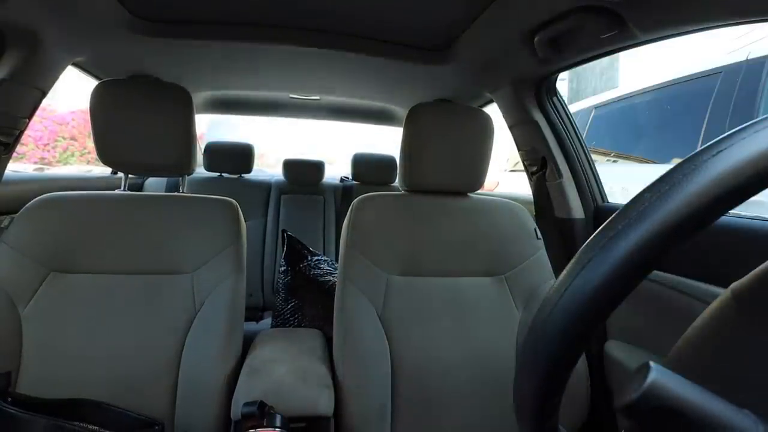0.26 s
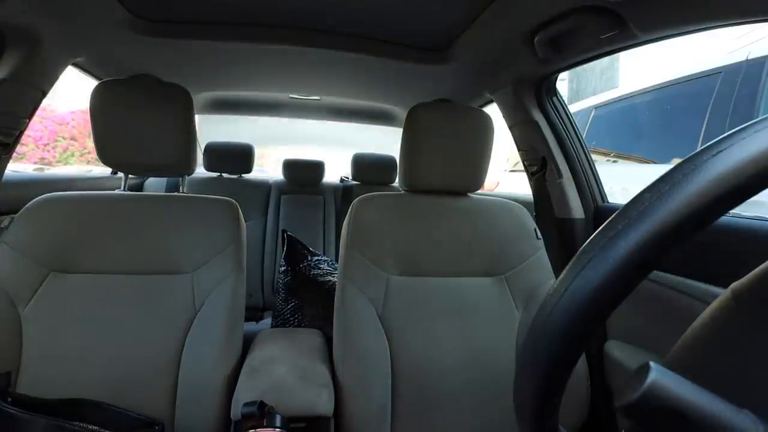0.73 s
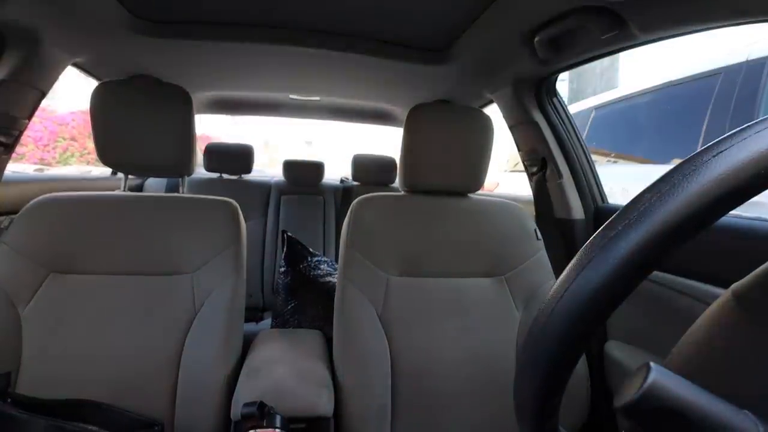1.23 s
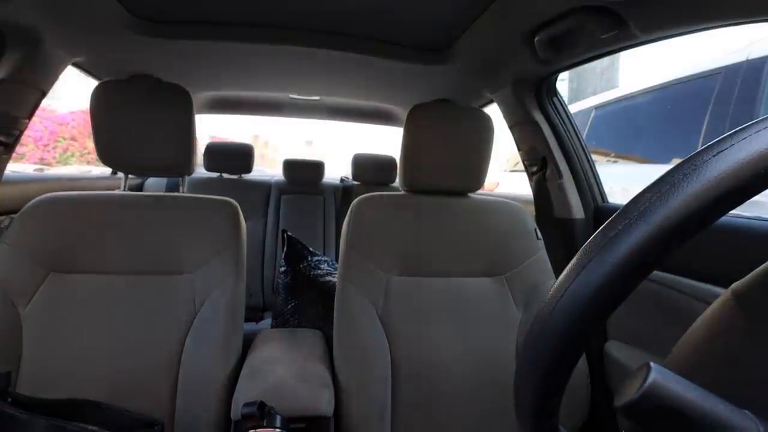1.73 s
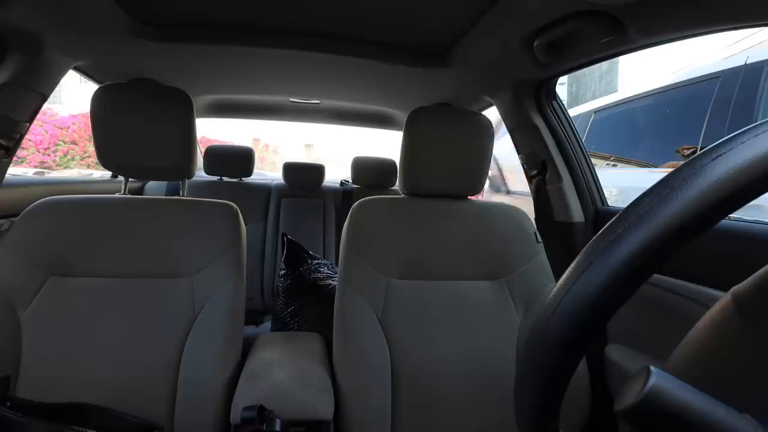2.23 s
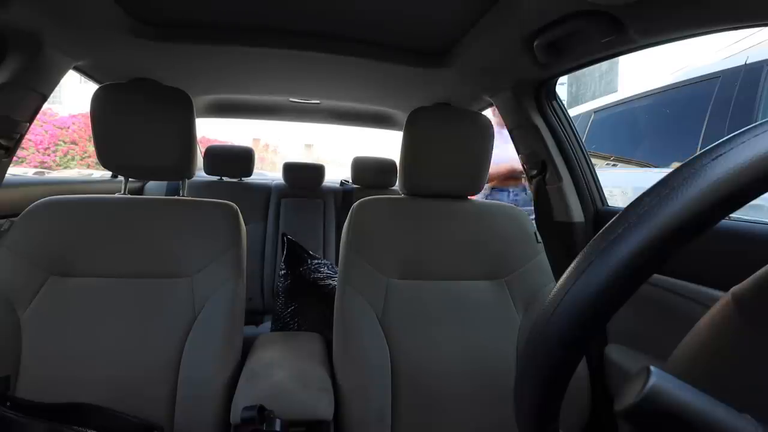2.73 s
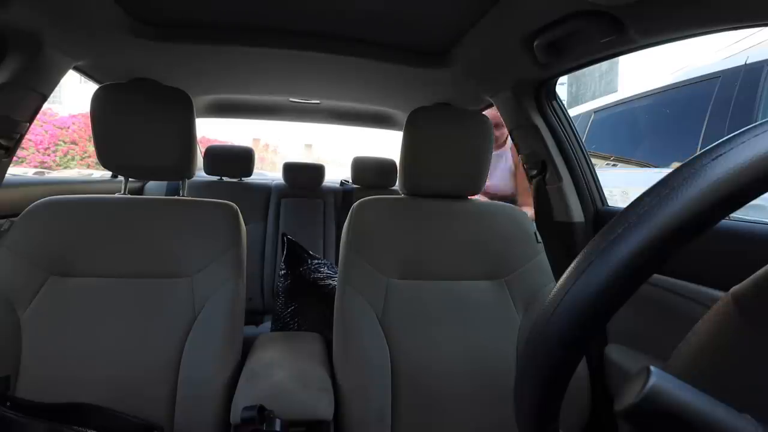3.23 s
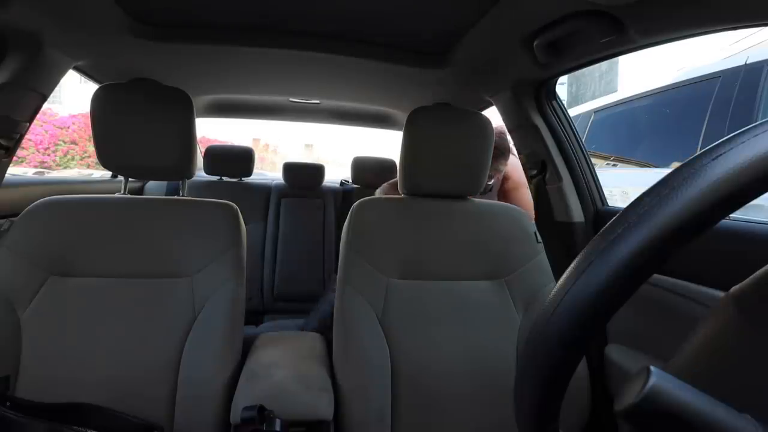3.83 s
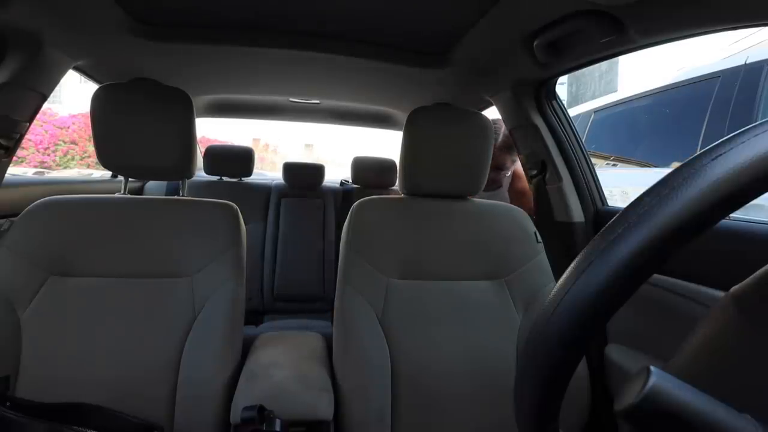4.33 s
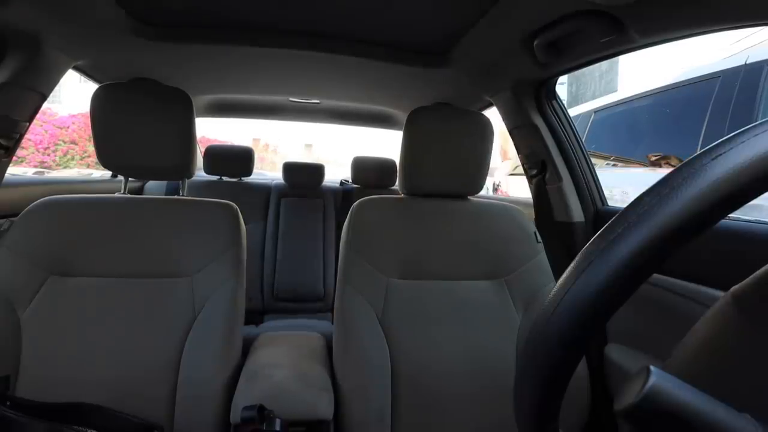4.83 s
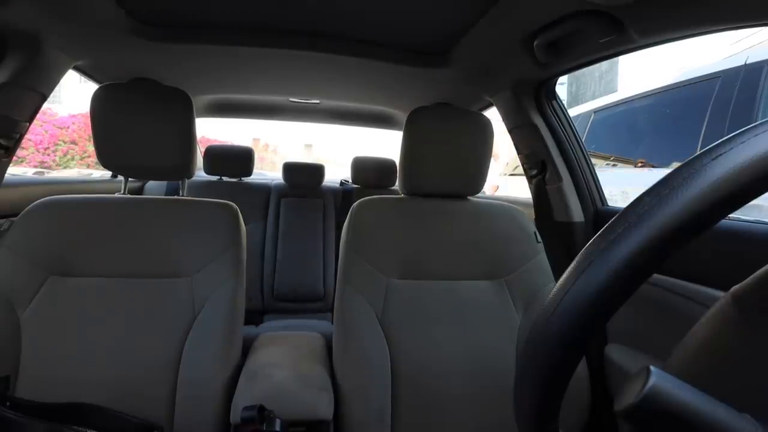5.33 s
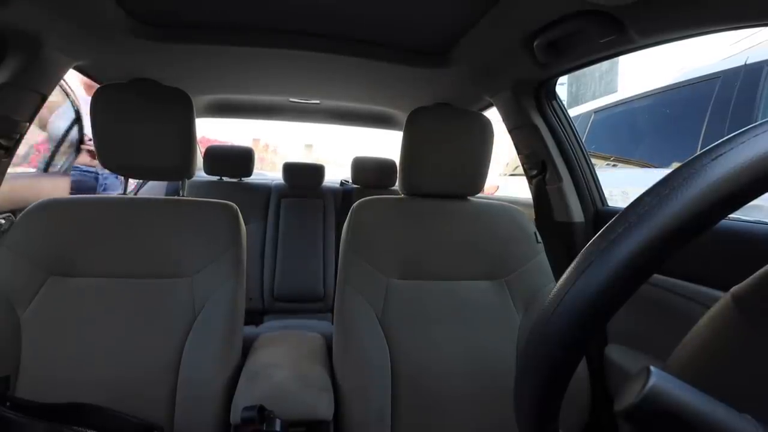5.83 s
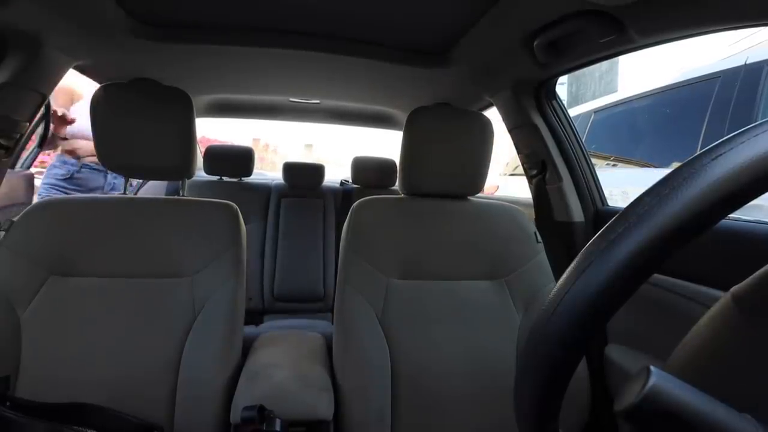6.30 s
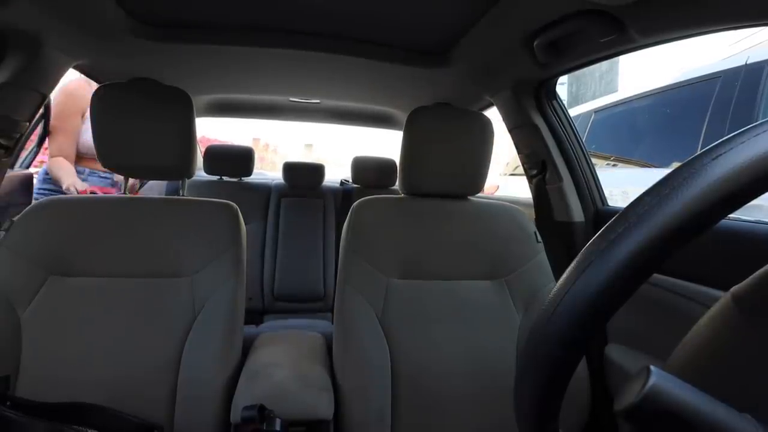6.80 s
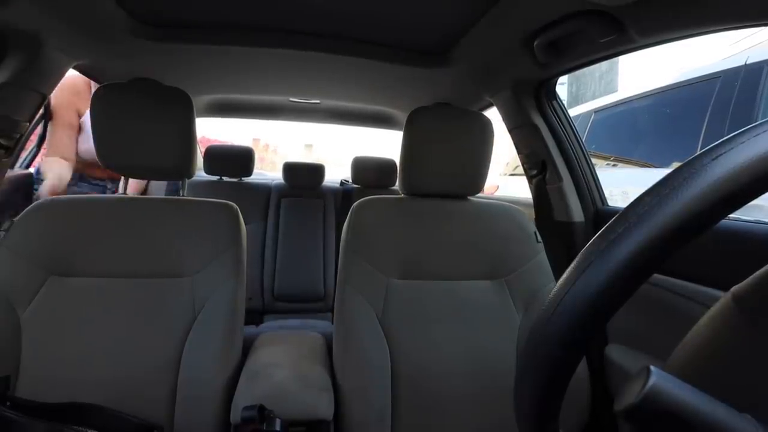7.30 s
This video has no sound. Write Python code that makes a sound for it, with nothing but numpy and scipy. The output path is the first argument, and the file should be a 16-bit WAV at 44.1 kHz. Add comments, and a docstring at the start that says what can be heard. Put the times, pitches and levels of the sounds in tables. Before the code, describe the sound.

A stereo microphone sits in a quiet car cabin, so short, dry sounds come with deep pressure thumps. First a big, overloading door slam, next a solid thunk, then handling of a crinkly bag and tiny metallic jingles. A short rising rub-squeak precedes another slam. After it come a faint motor hum, latch clacks, dragging cloth, crackly scuffs and final knocks.

```python
"""Inside a parked car, street noise leaks in and the cabin booms near 50 Hz; layer levels jump between stretches.
A slam at 1.3 s and a blow at 2.3 s ring thud, panel and latch modes; slams also pump the cabin air.
From 2.4 s a stiff bag crackles (ringing grains) and keys jingle (ringing touches); near 4 s a strap squeaks upward.
A second slam at 4.9 s, then a motor buzzes (sines) around latch clicks; from 6.6 s scuffs, cloth and last knocks.
Two close microphone ports hear the bass alike and the treble in opposition; the slams overload them."""
import sys
import numpy as np
from scipy import signal
from scipy.fft import rfft, irfft, next_fast_len
from scipy.io import wavfile
from scipy.ndimage import uniform_filter1d

SR = 44100
rng = np.random.default_rng(int(sys.argv[2]) if len(sys.argv) > 2 else 0)


def persist_wave(psi):
    """Save psi, clipped to +-1, as 16-bit WAV."""
    counts = np.round(np.clip(psi, -1, 1) * 32767).astype(np.int16)
    wavfile.write(sys.argv[1], SR, np.atleast_2d(counts).T)


N = 333484


def from_db(db):
    """Amplitude ratio of a level in dB."""
    return 10 ** (np.asarray(db) / 20)


def rms_one(x):
    """Scale to rms 1."""
    return x / np.sqrt(np.mean(x ** 2) + 1e-20)


def shaped(x, spectrum):
    """Filter by a gain in dB, interpolated over log frequency."""
    size = next_fast_len(len(x))
    hz, gain_db = np.transpose(spectrum)
    bin_hz = np.arange(size // 2 + 1) * SR / size
    gain = from_db(np.interp(np.log(bin_hz + 1), np.log(hz + 1), gain_db))
    return irfft(rfft(x, size) * gain, size)[:len(x)]


def drift(rate_hz):
    """Slow random wander: noise twice through a one-pole low-pass; rms 1."""
    r = np.exp(-2 * np.pi * rate_hz / SR)
    settled = signal.lfilter([1], [1, -2 * r, r * r], rng.standard_normal(N + SR))[SR:]
    return rms_one(settled)


def ring(force, hz, t60_s):
    """Damped resonance: a unit click sets a sine of initial height 1 ringing."""
    r = from_db(-60 / (t60_s * SR))
    w = 2 * np.pi * hz / SR
    return signal.lfilter([0, np.sin(w)], [1, -2 * r * np.cos(w), r * r], force + 1e-18)


def swell(length_s, rise):
    """Envelopes, one row a sound: power-law rise, exponential fall; time constant held to 0.5-30 ms."""
    age = np.arange(SR // 8) / SR / np.clip(length_s, .0005, .03)[:, None]
    return age ** rise * np.exp(-age)


def noise(spectrum, flicker_db, grain_db):
    """Coloured noise of uneven grains; four bands flicker partly together, partly alone; rms 1."""
    out = 0
    together = drift(15.0)
    edges_hz = np.geomspace(spectrum[1][0], spectrum[-2][0], 5)
    for low, high in zip(edges_hz[:-1], edges_hz[1:]):
        grain_gain = from_db(grain_db * np.minimum(rng.exponential(1, N), 5))
        grains = rng.standard_normal(N) * grain_gain
        band_hz = [low / 1.2, min(high * 1.2, .45 * SR)]
        band = signal.sosfilt(signal.butter(1, band_hz, "band", fs=SR, output="sos"), grains)
        flicker = from_db(flicker_db * (.6 * together + drift(25.0)))
        out = out + rms_one(band) * np.sqrt(high - low) * flicker
    return rms_one(shaped(out, spectrum))


# steady backgrounds: start t/s, relative levels/dB of boom, shudder, street, cloth, hiss,
# sink of boom and shudder / dB per s, sink of the others / dB per s
STRETCH_LEVELS = [(0.0, -31, -43.5, -49, -62, -71.5, -4.5, 0),
                  (1.128, -23.5, -42, -44, -58.5, -73.5, 2, 15), (1.27, -24, -44, -66, -81.5, -99, 4, -7.5),
                  (2.163, -30.5, -46.5, -51, -64, -76, -3, -3.5),
                  (2.918, -26, -47.5, -53.5, -61, -75, 0, -5), (3.697, -26.5, -40.5, -41, -39.5, -62, 2, 6),
                  (4.28, -27.5, -37, -39, -40.5, -57.5, 1, -5),
                  (4.769, -41, -48, -56.5, -64, -70, -17.5, 4), (5.09, -21, -33, -50, -62.5, -71, 14, 11),
                  (5.262, -48.5, -51, -56.5, -61, -71, 10, 5), (5.525, -59, -48.5, -68, -80, -90, -1, 1),
                  (5.553, -53, -43.5, -51.5, -69.5, -81.5, 0.5, -30),
                  (5.83, -50.5, -50.5, -50, -56, -72.5, 12, 17),
                  (6.23, -40.5, -54, -52.5, -58.5, -71, 12, 2), (6.6, -33.5, -43, -44.5, -51, -73, -6, 2)]


def stretch_at(s):
    """Index of the stretch a moment belongs to."""
    starts_s = np.array(STRETCH_LEVELS)[:, 0]
    return np.maximum(np.searchsorted(starts_s, s, "right") - 1, 0)


def background():
    """Gains of five steady layers: each stretch starts at its own level and changes evenly in dB."""
    t = np.arange(N) / SR
    now = np.array(STRETCH_LEVELS)[stretch_at(t)].T
    sink_db_per_s = now[[6, 6, 7, 7, 7]]
    return from_db(now[1:6] - sink_db_per_s * (t - now[0]))


def surges(rows, rise_db_per_s, fall_db_per_s):
    """Gains stirred up by events, each within its stretch: even climb in dB to the peak, even fall."""
    t = np.arange(N) / SR
    stretch = stretch_at(t)
    power = 0
    for s, *peak_db in rows:
        before_db = np.outer(rise_db_per_s, np.maximum(s - t, 0))
        after_db = np.outer(fall_db_per_s, np.maximum(t - s, 0))
        level_db = np.array(peak_db)[:, None] - before_db - after_db
        power = power + (stretch == stretch_at(s)) * from_db(level_db) ** 2
    return np.sqrt(power)


# cabin air resonance: f/Hz, relative density/dB
BOOM_SPECTRUM = [(12, -55), (20, -9), (34, -5), (48, -1), (64, -5.5), (91, -19), (100, -42), (130, -37),
                 (220, -120)]
# floor pan and panels: f/Hz, relative density/dB
SHUDDER_SPECTRUM = [(47, -14.5), (80, 5), (92, 1), (119, -0.5), (178, -3), (290, -20), (380, -46.5),
                    (640, -120)]


def car_body(boom_gain, shudder_gain):
    """Cabin air and floor pan resonate when the car is shaken; the boom's swing is evened out."""
    boom = noise(BOOM_SPECTRUM, 0, 0)
    envelope = np.abs(signal.hilbert(boom, next_fast_len(N))[:N])
    boom = rms_one(boom / (uniform_filter1d(envelope, size=800) + 0.35))
    shudder = noise(SHUDDER_SPECTRUM, flicker_db=1.5, grain_db=-3)
    return from_db(-4.5) * boom_gain * boom + shudder_gain * shudder


# street wash: f/Hz, relative density/dB
STREET_SPECTRUM = [(140, -21.5), (240, -0.5), (325, 6.5), (433, -2), (668, -5.5), (725, -8), (1180, -14),
                   (1700, -18.5), (2210, -24.5), (3740, -120)]
# cloth rustle: f/Hz, relative density/dB
CLOTH_SPECTRUM = [(820, 3), (1400, -2), (1950, -4.5), (2090, -3), (2700, -6), (4040, -14), (5410, -19.5),
                  (6000, -25.5), (7800, -76.5), (13200, -120)]
# fine hiss, also the bright fringe of the scuffs: f/Hz, relative density/dB
BAG_SPECTRUM = [(2940, 3.5), (5000, -3.5), (6740, -8.5), (7620, -10), (9520, -20.5), (12600, -20.5),
                (15500, -23.5)]


def air(street_gain, cloth_gain, hiss_gain):
    """Smooth street wash, grainy cloth friction and a finer, grainier hiss on top."""
    street = street_gain * noise(STREET_SPECTRUM, flicker_db=0.5, grain_db=1.5)
    cloth = cloth_gain * noise(CLOTH_SPECTRUM, flicker_db=2.0, grain_db=2.5)
    hiss = hiss_gain * noise(BAG_SPECTRUM, flicker_db=3.5, grain_db=4.5)
    return street + cloth + hiss


# car rocks after a blow or under a hand: peak t/s, relative levels/dB of boom, shudder, trim rattle
SHAKE_PEAKS = [(0.24, -38.5, -34, -48), (0.93, -28, -37.5, -52), (1.25, -10.5, -31.5, -49.5),
               (1.385, -7, -18.5, -40.5), (1.58, -16.5, -36.5, -59.5), (2.22, -38.5, -49, -39),
               (2.31, -20.5, -16.5, -39), (3.3, -24, -55, -57), (3.62, -22, -59.5, -64),
               (3.72, -39, -32, -34), (4.3, -24, -36, -40), (4.44, -27, -33.5, -39),
               (4.58, -34.5, -28, -35.5), (4.73, -31.5, -33.5, -37), (4.89, -13, -26, -34.5),
               (4.97, -10.5, -25, -41), (5.05, -11, -20.5, -42.5), (5.72, -50, -32.5, -38),
               (6.25, -26, -41, -42.5), (6.3, -40, -36.5, -53), (6.8, -32, -39, -49),
               (7.03, -27, -59, -64.5), (7.3, -24, -54.5, -49), (7.56, -21, -37, -31.5)]
# climb before the peak: boom, shudder, trim [dB per s]
SHAKE_CLIMB_DB_PER_S = (195.5, 157, 142)
# fall after the peak: boom, shudder, trim [dB per s]
SHAKE_DROP_DB_PER_S = (128, 106, 144.5)
# cloth and bag are moved: peak t/s, relative levels/dB of cloth, hiss
RUSTLE_PEAKS = [(2.23, -59, -80), (2.96, -69, -64), (3.2, -46.5, -41.5), (3.32, -65.5, -52.5),
                (3.705, -35, -47), (4.885, -54, -80), (5.74, -50.5, -74), (5.88, -58.5, -86),
                (6.63, -43.5, -82), (6.78, -46.5, -53.5), (6.98, -48, -68), (7.1, -40, -73),
                (7.25, -38.5, -63), (7.37, -41, -66), (7.52, -39, -61)]
RUSTLE_RISE_DB_PER_S, RUSTLE_FALL_DB_PER_S = (237.5, 265), (84, 103.5)   # cloth, hiss
BOOM_WANDER_DB, JUMP_S = 1.4, .01


def noises():
    """Steady and stirred levels add in power; trim rattle is noise of the street wash's colour."""
    steady = background()
    steady[0] *= from_db(BOOM_WANDER_DB * drift(9.9))
    shaken = surges(SHAKE_PEAKS, SHAKE_CLIMB_DB_PER_S, SHAKE_DROP_DB_PER_S)
    rustled = surges(RUSTLE_PEAKS, RUSTLE_RISE_DB_PER_S, RUSTLE_FALL_DB_PER_S)
    gains = np.hypot(steady, [*shaken, *rustled])
    boom, shudder, street, cloth, hiss = uniform_filter1d(gains, size=round(JUMP_S * SR), axis=1)
    return car_body(boom, shudder) + air(street, cloth, hiss)


# small motor outside, harmonics: f/Hz, relative level/dB
BUZZ_HARMONICS = [(290.7, -56), (576.0, -61.5), (866.7, -62), (1157, -67.5), (1443, -69), (1733, -72.5),
                  (2024, -68.5), (2315, -68), (2600, -77)]
# motor heard: start t/s, end t/s, level/dB
BUZZ_SPANS = [(5.14, 5.528, -6), (5.89, 6.63, -5)]
# faint steady tones: start t/s, end t/s, f/Hz, rms pitch wander/Hz, relative level/dB
FAINT_TONES = [(1.6, 2.156, 1280, 2, -81.5), (2.77, 3.7, 351.8, 12.63, -60.5), (5.2, 5.53, 6067, 12, -85),
               (5.89, 6.6, 6100, 13, -84)]


def tones():
    """Motor harmonics and faint tones are sines with one slight common level waver."""
    t = np.arange(N) / SR
    waver = from_db(1.9 * drift(5.3))
    heard = 0
    for start, end, level_db in BUZZ_SPANS:
        heard = heard + from_db(level_db) * np.clip(np.minimum(t - start, end - t) / 0.026, 0, 1)
    buzz = sum(from_db(db + 5.5) * np.sin(2 * np.pi * hz * t + hz) for hz, db in BUZZ_HARMONICS)
    out = heard * waver * buzz
    for start, end, hz, width_hz, level_db in FAINT_TONES:
        on = np.clip(np.minimum(t - start, end - t) / 0.022, 0, 1)
        phase = 2 * np.pi * np.cumsum(hz + width_hz * drift(10.9)) / SR
        out += on * waver * from_db(level_db + 10.5) * np.sin(phase)
    return out


# thin dry ticks: t/s, relative level/dB
TICK_CLICKS = [(1.1315, -13.5), (1.244, -19.5), (2.1653, -24), (3.1674, -34), (4.7665, -16), (5.5543, -42)]


def ticks():
    """Single-sample clicks, the same at both ports."""
    out = np.zeros(N)
    for s, level_db in TICK_CLICKS:
        out[round(s * SR)] = from_db(level_db - 13.0)
    return out


# key modes: f/Hz, relative level/dB
KEY_MODES = [(5720, -4), (6460, -20), (7050, -11), (7880, -14), (9120, -3.5), (9440, -9), (9870, -3),
             (10400, -7), (11400, -1), (11650, -3), (12000, -6), (12600, -6), (13900, -6), (15600, 11)]
# jingles of the bunch: t/s, relative level/dB, time constant/s
KEY_JINGLES = [(3.168, -46.5, .03), (3.222, -49, .025), (3.303, -57, 0.025), (3.35, -60, 0.0082),
               (3.47, -59, 0.011), (3.594, -61, 0.018), (3.64, -60.5, 0.021), (3.7, -63, 0.035),
               (6.75, -60, 0.021), (6.802, -64, 0.017)]
KEY_T60_S, TOUCHES_PER_S = .09, 600


def keys():
    """Uneven touches of metal ring the key modes; every jingle favours other modes."""
    s, level_db, length_s = np.transpose(KEY_JINGLES)
    starts = np.round(s * SR).astype(int)
    shapes = swell(length_s, rise=0.34)
    favour_db = 3.0 * rng.standard_normal((len(s), len(KEY_MODES)))
    out = np.zeros(N + SR)
    for (hz, mode_db), own_db in zip(KEY_MODES, favour_db.T):
        hits = rng.random(shapes.shape) < TOUCHES_PER_S / SR
        touches = hits * rng.standard_normal(shapes.shape) * shapes
        clicks = np.zeros(N + SR)
        for at, touch, gain in zip(starts, touches, from_db(level_db + mode_db + own_db)):
            clicks[at:at + len(touch)] += gain * touch
        out += ring(clicks, hz, KEY_T60_S)
    return out[:N]


# strap dragged over the seat: t/s, f/Hz, relative level/dB
STRAP_WHISTLE = [(3.93, 1040, -46), (4.03, 1170, -38), (4.17, 1390, -36), (4.25, 1480, -41),
                 (4.34, 1650, -43)]
# side strands of the squeak: pitch ratio, relative level/dB
SIDE_STRANDS = [(.87, -4), (1.14, -8)]


def strap():
    """Friction squeak: as pitch rises it roughens and frays into patchy side strands."""
    first, last = STRAP_WHISTLE[0], STRAP_WHISTLE[-1]
    curve = [(first[0] - .02, first[1], -90), *STRAP_WHISTLE, (last[0] + 0.022, last[1], -90)]
    s, pitch_hz, curve_db = np.transpose(curve)
    t = np.arange(N) / SR
    hz = np.interp(t, s, pitch_hz)
    level_db = np.interp(t, s, curve_db)
    rough = np.clip((hz - 1100) / 300, .35, 1)
    phase = 2 * np.pi * np.cumsum(hz) / SR
    out = 0
    for ratio, strand_db in [(1, 0.011), *SIDE_STRANDS]:
        # only the main strand keeps a steady part
        clean, share = (.8 + 1.2 * (1 - rough), 1) if ratio == 1 else (0, rough)
        sine_sway = rough * drift(90.0)
        cosine_sway = rough * drift(90.0)
        patchy = from_db(strand_db + 3 * drift(20.0))
        strand = (clean + sine_sway) * np.sin(ratio * phase) + cosine_sway * np.cos(ratio * phase)
        out = out + share * patchy * strand
    return from_db(level_db - 5.5) * out


# handles, seals and stiff bag grasped: t/s, relative level/dB, time constant/s, centre f/Hz, treble/dB
SCUFF_EVENTS = [(1.307, -45, 0.012, 2310, -85), (1.36, -47.5, 0.02, 2400, -84),
                (2.242, -40, .01, 2400, -64.5), (2.268, -34.5, 0.006, 2300, -63.5),
                (2.463, -33, .007, 2200, -68), (2.478, -34, 0.0049, 1500, -71),
                (2.585, -36.5, 0.004, 2960, -68), (2.679, -42.5, 0.023, 2360, -65),
                (2.82, -43, 0.023, 2600, -79), (2.871, -37.5, 0.0082, 2430, -51.5),
                (2.891, -36.5, 0.01, 2900, -48), (2.928, -40, 0.0095, 2270, -47),
                (2.963, -39, 0.0061, 2680, -77), (3.137, -29, 0.005, 2620, -50),
                (3.178, -34, .006, 2500, -55), (3.196, -22, 0.021, 2520, -29),
                (3.206, -24, 0.007, 1300, -60), (3.277, -28.5, 0.018, 2570, -45),
                (3.286, -27, 0.014, 3620, -55), (3.32, -23.5, 0.0096, 2640, -33.5),
                (3.351, -28.5, 0.0059, 2760, -32.5), (3.397, -35.5, 0.0093, 2260, -61),
                (3.471, -33.5, 0.016, 2770, -42.5), (3.497, -39, 0.0069, 2610, -45),
                (3.593, -32.5, 0.035, 3300, -55), (3.641, -40, 0.034, 2680, -47),
                (4.445, -20, 0.0028, 2200, -65), (4.951, -37.5, 0.0065, 1900, -76),
                (5.678, -46, 0.013, 2000, -75), (5.748, -38, .006, 3000, -71),
                (5.821, -8, 0.004, 3500, -80), (5.827, -24, 0.0097, 3200, -70),
                (5.836, -28, 0.014, 1150, -75), (6.613, -29.5, 0.0089, 2840, -69),
                (6.644, -30, 0.0073, 2700, -65), (6.678, -29, 0.0054, 1650, -68),
                (6.695, -32, 0.035, 2920, -47), (6.7546, -25, 0.038, 2980, -44),
                (6.762, -25.5, 0.011, 970, -60.5), (6.784, -27, 0.013, 3000, -43),
                (6.838, -39, 0.0024, 2430, -44), (6.913, -27.5, .006, 2000, -61),
                (6.958, -35, .006, 2390, -65), (7, -34, 0.0046, 2200, -65), (7.069, -34.5, 0.01, 2800, -64),
                (7.137, -27.5, 0.006, 2080, -62), (7.206, -25.5, 0.0062, 2320, -40),
                (7.219, -28, 0.0033, 2300, -55), (7.288, -20, 0.0073, 2350, -46.5),
                (7.365, -34, 0.0084, 2300, -62)]
# narrow rings of the bag: f/Hz, relative level/dB
BAG_MODES = [(930, -2.5), (1590, -6), (1980, -4), (2520, 4.5), (2800, -1), (3600, 2), (4240, -7)]
GRAINS_PER_S = 3000


def scuffs():
    """Dense crackle: broad ring at each grasp's pitch, the bag's rings nearest to it, bright fringe."""
    out = np.zeros(N + SR)
    shapes = swell(np.array(SCUFF_EVENTS)[:, 2], rise=0.52)
    hits = (rng.random(shapes.shape) < GRAINS_PER_S / SR) * rng.standard_normal(shapes.shape)
    grains = hits * from_db(1.5 * np.minimum(rng.exponential(1, shapes.shape), 5))
    bright = signal.butter(2, 5500, "high", fs=SR, output="sos")
    favour_db = 3 * rng.standard_normal((len(shapes), len(BAG_MODES)))
    for event, shape, grain, own in zip(SCUFF_EVENTS, shapes, grains, favour_db):
        s, level_db, _, hz, treble_db = event
        narrow = 0
        for (mode_hz, mode_db), own_db in zip(BAG_MODES, own):
            gain_db = mode_db + own_db - 10.0 * abs(np.log2(mode_hz / hz))
            narrow = narrow + from_db(gain_db) * ring(grain, mode_hz, 87.0 / mode_hz)
        broad = ring(ring(grain, hz, 0.99 / hz), hz, 10.0 / hz)
        body = from_db(level_db - 3.5) * rms_one(broad + from_db(-10.5) * narrow)
        treble = shaped(signal.sosfilt(bright, grain), BAG_SPECTRUM)[:len(grain)]
        fringe = from_db(treble_db - 6.0) * rms_one(treble)
        at = round(s * SR)
        out[at:at + len(shape)] += shape * (body + fringe)
    return out[:N]


# slammed door pumps the cabin air: start t/s, peak level/dB, length/s
AIR_PUMPS = [(1.266, 3, 0.012), (1.369, 0, 0.016), (1.397, -3, 0.014), (4.873, 0, .014), (5.047, -4, .016)]


def pumps():
    """Each slam's over-pressure is one smooth sine-squared pulse."""
    t = np.arange(N) / SR
    out = 0
    for s, level_db, length_s in AIR_PUMPS:
        out = out + from_db(level_db) * np.sin(np.pi * np.clip((t - s) / length_s, 0, 1)) ** 2
    return out


CABIN_T60_S, CABIN_DB = 0.095, -11


def cabin(x):
    """The padded cabin answers with a short dense decaying tail, thin in the bass."""
    tail = rng.standard_normal(SR // 4) * from_db(-60 * np.arange(SR // 4) / SR / CABIN_T60_S)
    tail = tail / np.sqrt(np.sum(tail ** 2))
    tail = signal.sosfilt(signal.butter(1, 400, "high", fs=SR, output="sos"), tail)
    return x + from_db(CABIN_DB) * signal.fftconvolve(x, tail)[:N]


def strike(out, times_s, forces, modes, level_at, choke=1):
    """Add every blow's ringing of each mode; a mode feels only its own range of the force."""
    for hz, mode_db, t60_s in modes:
        rings = ring(ring(forces, hz, 1.74 / hz), hz, t60_s) * choke
        level_db = level_at(hz) + mode_db + rng.normal(0, 1.0, len(times_s))
        gains = from_db(level_db) / np.abs(rings).max(axis=1)
        for at, gain, shape in zip(np.round(times_s * SR).astype(int), gains, rings):
            out[at:at + len(shape)] += gain * shape


# blows on door, lid and latch: t/s, relative levels/dB of thud, panel ring, clank, crack,
# strongest thud f/Hz, strongest ring f/Hz
BLOW_EVENTS = [(0.918, -25, -33.5, -58, -60, 62, 260), (1.254, -14, -12.5, -22, -39, 70, 284),
               (1.26, -12.5, -4, -12.5, -27, 178.5, 273), (1.265, -14.5, -29, -47, -33, 62, 300),
               (1.31, -2, -21.5, -35.5, -53.5, 62.3, 355), (1.337, -22.5, -19, -38, -66, 60.8, 370),
               (1.37, -16, -19.5, -39, -60, 62, 260), (1.398, -13, -22, -55, -69.5, 61.5, 262),
               (1.438, -13.5, -43.5, -72, -70.5, 61, 264), (1.458, -24.5, -24.5, -59, -76, 166.6, 259),
               (2.19, -45, -32, -47, -51.5, 62.7, 286), (2.274, -32, -33.5, -30, -45, 179, 399),
               (2.281, -8.5, -3, -16.5, -35, 125, 270), (2.296, -24, -13, -24.5, -44.5, 180, 275),
               (2.309, -22, -13.5, -26.5, -54, 175, 330), (2.325, -23, -18, -32.5, -57, 181, 330),
               (2.343, -20.5, -17.5, -53.5, -72, 119, 326), (2.457, -19, -27.5, -33, -35.5, 62, 520),
               (2.633, -20, -35, -39.5, -37, 62, 370), (3.701, -27, -31, -26, -33, 62, 443),
               (3.9, -53, -45, -37, -20.5, 62, 541), (4.289, -14.5, -29, -45, -55, 70.6, 331),
               (4.572, -12, -36.5, -26, -50.5, 120.7, 280), (4.628, -20, -16.5, -24.5, -34.5, 92.8, 335),
               (4.69, -38.5, -26, -27, -31, 62, 303), (4.856, -29, -8, -12.5, -38, 177, 280),
               (4.861, -27, 0, -8.5, -28.5, 177, 495), (4.871, -15.5, -3, -7.5, -22.5, 62, 490),
               (4.878, -18.5, -29.5, -35, -50, 54.6, 301), (4.926, -28.5, -20.5, -48.5, -48.5, 77, 263),
               (4.959, -11.5, -26, -42, -53.5, 61.7, 350), (5.04, -14, -28, -48, -57, 55, 380),
               (5.067, -25, -33, -40, -45, 78, 265), (5.552, -44.5, -32.5, -59, -78, 172, 267),
               (5.595, -37, -30.5, -61, -64, 145, 314), (5.7, -35.5, -26.5, -24.5, -48, 161, 284),
               (5.708, -29, -15.5, -24.5, -40, 97, 307), (5.73, -29, -17, -38, -47, 180, 247),
               (5.75, -33, -19.5, -54, -47, 180, 290), (5.82, -43, -43, -24, -25, 183, 455),
               (6.24, -50, -25, -47, -46.5, 62, 303), (6.268, -27.5, -27.5, -38, -50, 148, 296),
               (6.655, -50, -21.5, -50, -48, 180, 350), (6.911, -57, -39, -51, -31.5, 67, 283),
               (7.518, -36, -27, -39, -54, 163, 334), (7.542, -28, -18.5, -36, -48, 120, 406)]
# thud modes: f/Hz, relative level/dB, t60/s
THUD_MODES = [(49.1, -11, 0.072), (81, -3.5, 0.08), (124.5, 4, 0.12), (181.7, 3.5, 0.14), (244, -4, 0.023)]
# panel modes, first six ring, the rest clank: f/Hz, relative level/dB, t60/s before the choke
PANEL_MODES = [(270, -1, .06), (313, 0.5, 0.067), (348, 0, 0.083), (399, -4, 0.043), (544, 4.5, 0.088),
               (615, -9.5, 0.023), (720, -3.5, .03), (787, -1.5, 0.035), (946, -6.5, 0.054),
               (1000, -0.5, 0.027), (1167, -4.5, 0.016), (1388, -7, 0.027)]
# latch modes: f/Hz, relative level/dB, t60/s
LATCH_MODES = [(1730, -6, 0.014), (1950, -5, 0.012), (2337, 10.5, 0.0064), (2780, 7.5, 0.0029),
               (2950, 8.5, 0.0033), (3660, -5, 0.022), (5100, -1, 0.0037), (5940, 4.5, 0.0015),
               (8120, -8.5, 0.0056), (11800, -11, 0.00067)]
RATTLE_S, CRACK_S = 0.0031, 0.0015   # time constants
CRACK_TILT_DB_PER_OCTAVE, TILT_PER_DB = -10.5, 0.627   # brighter the more crack stands over clank
SEAL_AFTER_S, SEAL_DB_PER_S = .011, 1500.5   # the rubber seal then chokes the panels


def blows():
    """Swelling contact rattles and a soft push excite body modes; where a blow lands favours some."""
    s, thud_db, ring_db, clank_db, crack_db, thud_hz, centre_hz = np.transpose(BLOW_EVENTS)
    tilt_db = CRACK_TILT_DB_PER_OCTAVE + TILT_PER_DB * (crack_db - clank_db)
    size = (len(s), SR // 8)
    rattles = rng.standard_normal(size) * swell(np.full(len(s), RATTLE_S), rise=1.09)
    cracks = rng.standard_normal(size) * swell(np.full(len(s), CRACK_S), rise=2.4)
    pushes = np.zeros((len(s), SR // 3))
    pushes[:, :SR // 200] = np.hanning(SR // 200)   # 5 ms
    choke = from_db(-SEAL_DB_PER_S * np.maximum(np.arange(SR // 8) / SR - SEAL_AFTER_S, 0))

    def ring_level(hz):
        return ring_db - 3.5 - 20.9 * np.abs(np.log2(hz / centre_hz))

    def clank_level(hz):
        return clank_db - 4.0

    def thud_level(hz):
        return thud_db - 13.3 * np.abs(np.log2(hz / thud_hz))

    def crack_level(hz):
        return crack_db - 9.5 + tilt_db * np.log2(hz / 2500)

    out = np.zeros(N + SR)
    strike(out, s, rattles, PANEL_MODES[:6], ring_level, choke)
    strike(out, s, rattles, PANEL_MODES[6:], clank_level, choke)
    strike(out, s, pushes, THUD_MODES, thud_level)
    strike(out, s, cracks, LATCH_MODES, crack_level)
    return out[:N]


# port difference: f/Hz, opposed minus common part/dB
PORT_DIFFERENCE = [(30, -27), (60, -24), (110, -14), (200, -18), (380, -16), (700, -8.5), (1290, -4.5),
                   (2380, -2), (4400, 5.5), (8120, 10), (15000, 11)]


def scene():
    """Seats and glass scatter (all-pass chain) what differs between ports; knocks differ less."""
    diffuse = noises() + scuffs() + keys() + strap() + tones()
    knocks = cabin(blows())
    scattered = diffuse + from_db(-3.5) * knocks
    for lag, share in ((23, .6), (61, .6), (113, .55), (197, .5)):   # lag in samples
        gap = np.zeros(lag - 1)
        scattered = signal.lfilter(np.r_[-share, gap, 1], np.r_[1, gap, -share], scattered)
    common = diffuse + knocks + pumps() + ticks()
    opposed = shaped(scattered, PORT_DIFFERENCE)
    return np.array([common + opposed, common - opposed])


RUMBLE_CUT_HZ, TOP_STOP_HZ = 25.5, 16000


def record(dry):
    """Deepest bass is lost, slams are squeezed against a soft ceiling, the top is cut."""
    heard = signal.sosfilt(signal.butter(2, RUMBLE_CUT_HZ, "high", fs=SR, output="sos"), dry)
    squeezed = heard / (1 + np.abs(heard) ** 6) ** (1 / 6)
    top_cut = signal.cheby2(16, 70, TOP_STOP_HZ, fs=SR, output="sos")
    return np.clip(signal.sosfilt(top_cut, 1.05 * squeezed), -1, 1)


dry = scene()
out = record(dry)
persist_wave(out)
```